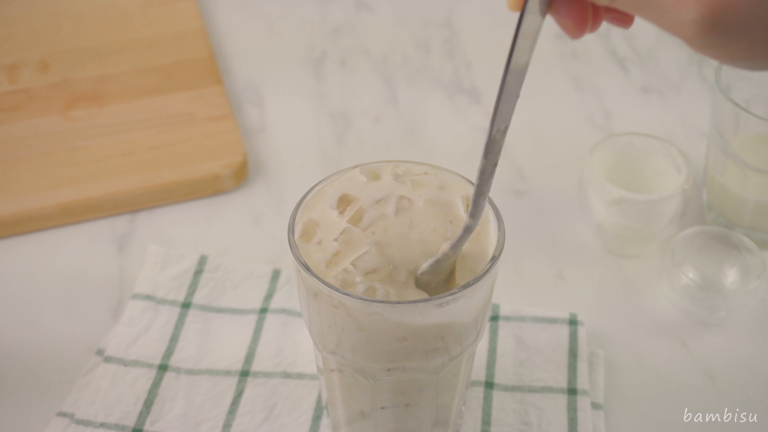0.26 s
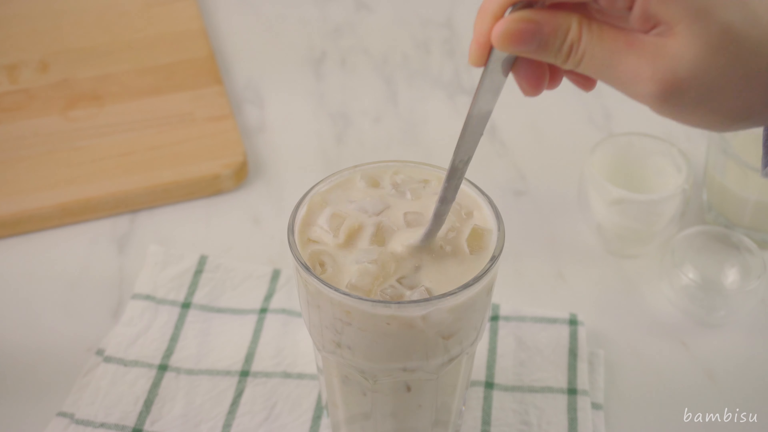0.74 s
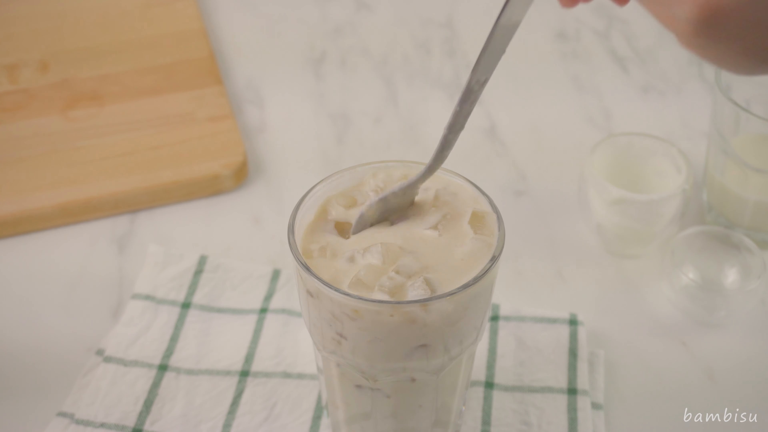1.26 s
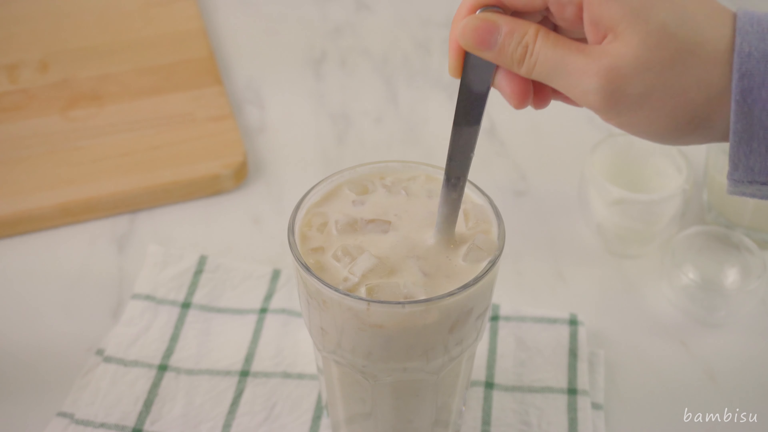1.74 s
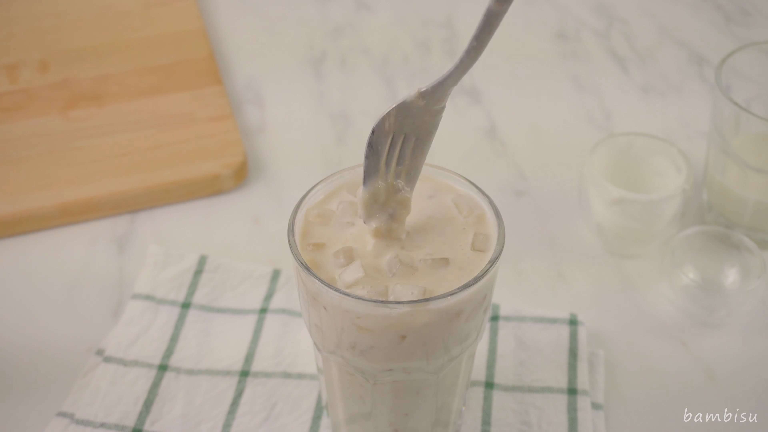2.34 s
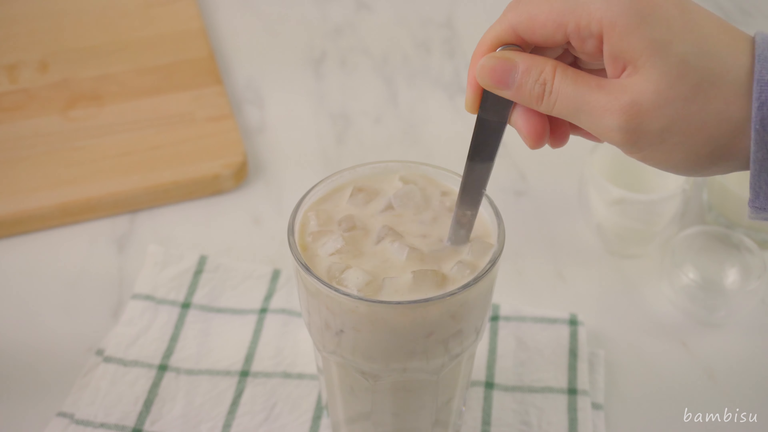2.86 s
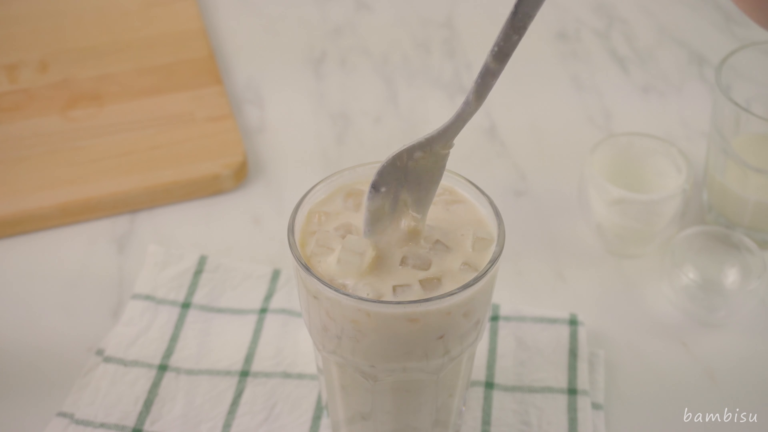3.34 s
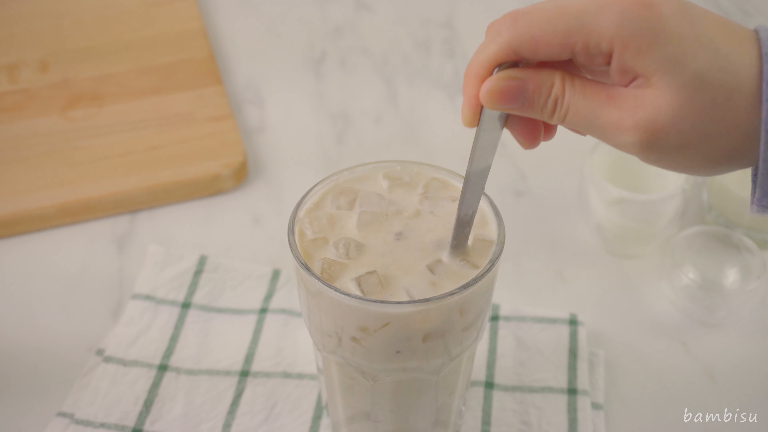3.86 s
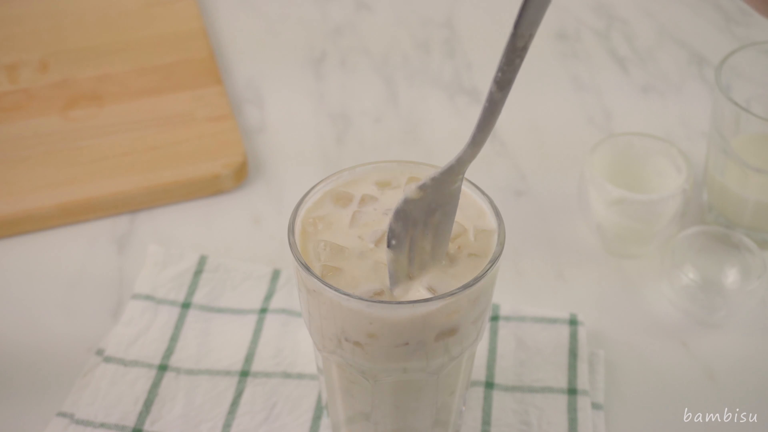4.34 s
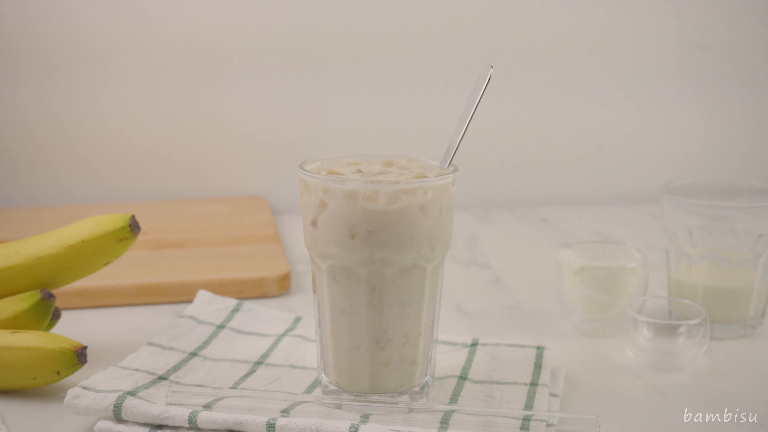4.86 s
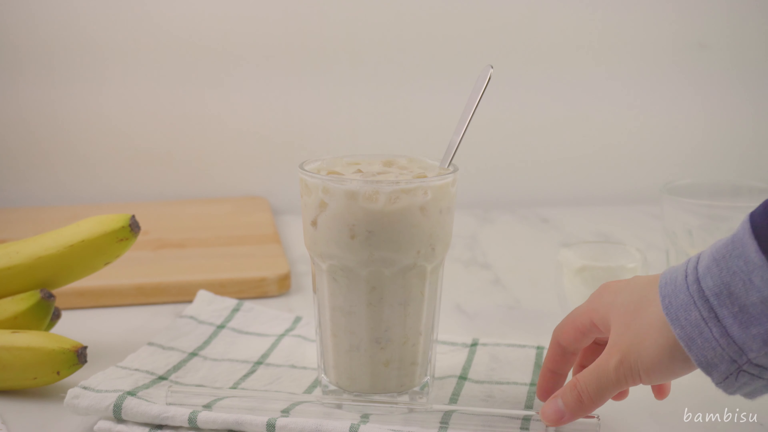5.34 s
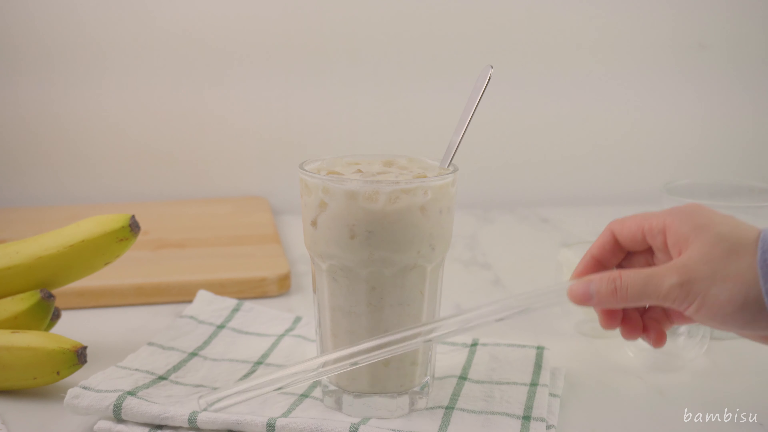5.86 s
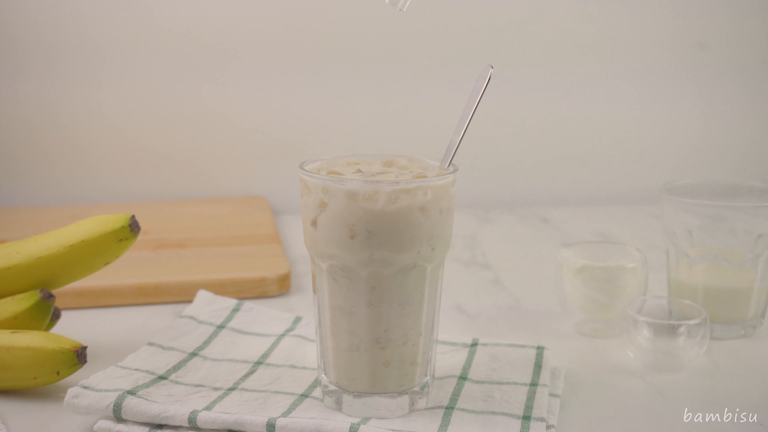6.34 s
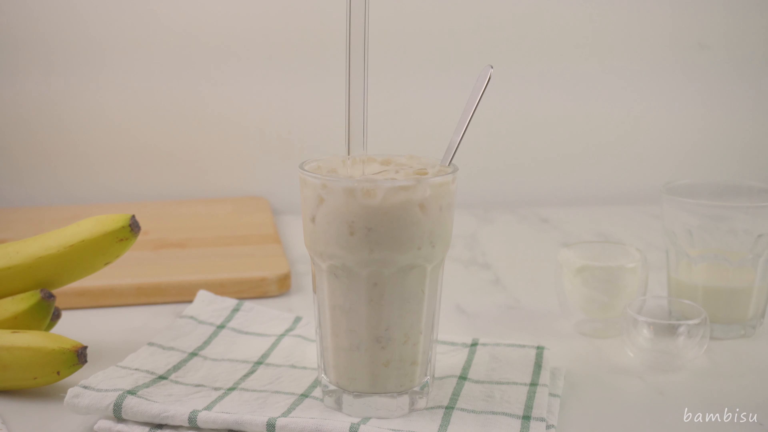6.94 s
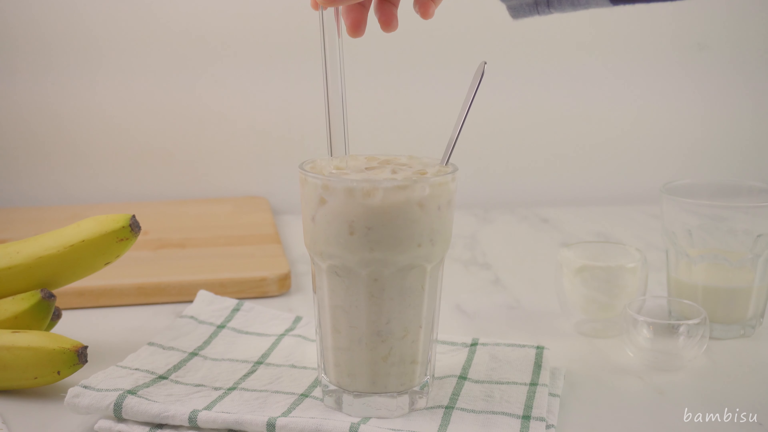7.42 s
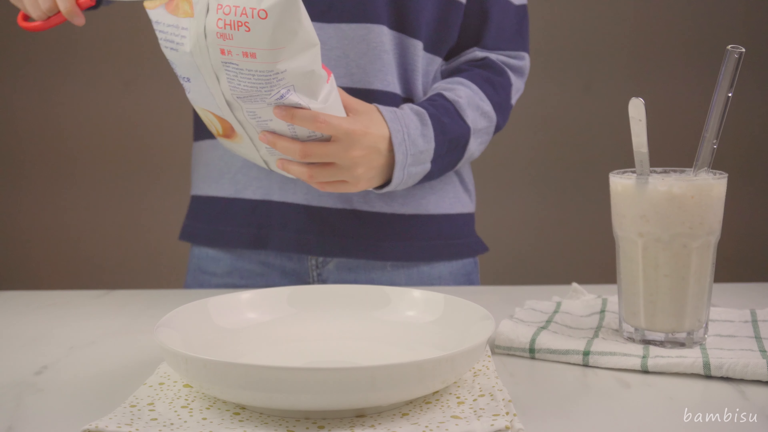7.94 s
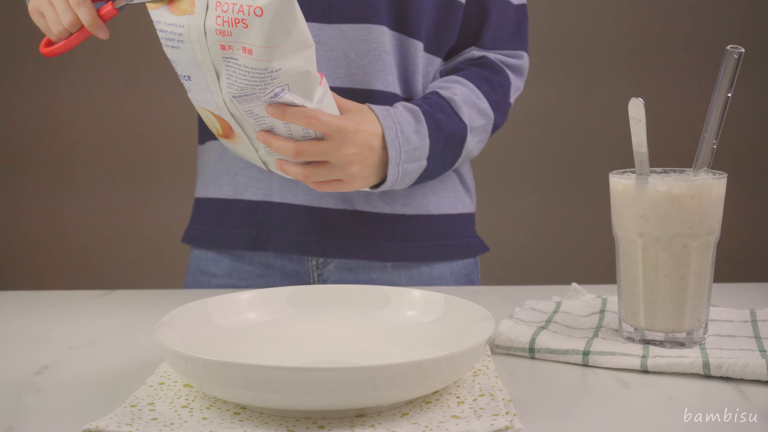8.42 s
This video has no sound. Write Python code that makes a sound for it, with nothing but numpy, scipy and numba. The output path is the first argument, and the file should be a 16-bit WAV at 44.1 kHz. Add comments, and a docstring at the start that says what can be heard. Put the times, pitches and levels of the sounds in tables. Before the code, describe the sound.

Close to the microphone in a quiet kitchen, a metal spoon slowly stirs ice in a tall, full glass. The cubes click and crunch in uneven clusters, with soft knocks as the glass rocks. After a pause, a glass straw clinks against the glass and is pushed through the ice with a few louder knocks. Finally, a little further off, a plastic crisp bag crinkles and snaps.

```python
"""Stirred ice and a crisp bag

Close by, a metal spoon slowly stirs ice in a tall glass of milky drink on a kitchen worktop.
Impacts excite the modes of cubes and glass, and the glass rocks on its cloth. A glass straw is
picked up, clinks and is pushed down through the ice. Further off, a plastic bag of crisps is
tipped: its film buckles in snaps and crackles, and the air inside resonates."""
import sys
import numpy as np
from scipy import signal
from scipy.fft import rfft, irfft
from scipy.io import wavfile
from scipy.ndimage import uniform_filter1d
from numba import njit

SR = 44100
rng = np.random.default_rng(int(sys.argv[2]) if len(sys.argv) > 2 else 0)


def dump(signal):
    """Clip the signal to [-1, 1] and save it as 16-bit WAV at the path in sys.argv[1]."""
    limited = np.clip(np.atleast_2d(signal).T, -1, 1)
    pcm = np.round(limited * 32767).astype(np.int16)
    wavfile.write(sys.argv[1], SR, pcm)


N = 382788
TIME = np.arange(N) / SR

# ice striking spoon, straw and wall: (time [s], level [dB], cube pitch [Hz], treble [dB])
ICE_IMPACTS = [(0.126, -24.5, 2520, -8), (0.135, -15.5, 2700, 0.5), (0.189, -21, 4670, -10),
               (0.2066, -21, 3470, 0), (0.251, -1.5, 11640, 3), (0.261, -10, 3520, 3),
               (0.2955, -6.5, 2550, -15), (0.3094, -9, 2700, -1.5), (0.3712, -7.5, 2870, -13.5),
               (0.4302, -11, 4840, -15.5), (0.4572, -8.5, 4170, -25), (0.7, -16, 1930, -41),
               (0.742, -16.5, 1850, -37), (0.768, -16.5, 2340, -14.5), (0.8017, -12, 2170, -14.5),
               (0.849, -1, 3840, -12.5), (1.0222, -28, 3410, -14), (1.2069, -22.5, 8400, -1),
               (1.2359, -8.5, 5400, -4), (1.2849, -6.5, 3560, -13), (1.2933, -2, 2170, -6.5),
               (1.4114, -15, 2680, -5), (1.4233, -6, 6000, -0.5), (1.538, -20.5, 2600, -7.5),
               (1.6291, -19, 2170, -4.5), (1.9235, -12, 2300, -13), (1.9578, -15.5, 2400, -19),
               (2.481, -18, 8370, 13), (2.5185, -12, 5760, -4), (2.5336, -13, 3570, -3),
               (2.564, -7, 3560, -16), (2.574, -4.5, 2510, -7), (2.62, -5.5, 1330, -17),
               (2.6283, -5, 2340, -9.5), (2.707, 7.5, 2320, -2.5), (2.912, -17.5, 9200, 14),
               (3.0553, -24, 2426, -14.5), (3.4058, -18, 3440, -10.5), (3.5084, -15.5, 2340, 2),
               (3.5344, -7.5, 4130, -5), (3.578, -4.5, 3740, -8), (3.61, -9, 2480, -13),
               (3.688, -7, 1470, -14.5), (3.769, -17, 3490, -4.5), (4.003, -14, 2230, -17),
               (4.0524, -15, 3600, -17), (4.077, -16.5, 4030, -16.5), (4.375, -24, 3450, -7),
               (4.388, -13, 8750, 9), (4.408, -13, 7960, 2), (4.447, -15.5, 3660, 1),
               (4.494, -22, 2630, -26), (4.5072, -6, 3590, -24.5), (4.563, -7.5, 4050, -19),
               (4.62, -12.5, 4160, -17.5), (4.699, -20, 4050, -15.5), (4.8406, -28, 2180, -4),
               (7.1195, 3.5, 2670, -5.5), (7.1517, -5, 1345, -3), (7.193, 6, 1300, -5.5),
               (7.221, -1, 3120, 1.5), (7.3201, -19.5, 5920, -4.5), (7.482, -33, 3160, -25)]
# spectrum of ice in the glass: (frequency [Hz], gain [dB])
ICE_SPECTRUM = [(300, -21.5), (750, -28), (1050, -7), (1400, -2), (1800, -7.5), (2350, 5.5), (4500, 1.5),
                (8000, 2), (11000, -10.5), (16000, -24)]
# modes of the glass, damped by the drink: (frequency [Hz], level [dB], t60 [s])
GLASS_MODES = [(1080, -3, .07), (1360, 0, .07), (2080, 4, .05)]
# pushes of the spoon: (start [s], push [s], settling [s], level [dB])
SPOON_STROKES = [(0.032, 0.08, 0.046, -58), (0.131, 0.2, 0.13, -40.5), (0.657, 0.11, 0.16, -57),
                 (1.208, 0.081, 0.31, -36), (1.42, 0.26, 0.019, -49.5), (1.879, 0.035, 0.29, -45),
                 (2.509, 0.25, 0.31, -43), (3.051, 0.055, 0.59, -57.5), (3.512, 0.12, 0.24, -35.5),
                 (3.96, 0.056, 0.076, -45.5), (4.391, 0.15, 0.23, -49.5)]
# blows that rock the glass: (time [s], level [dB], frequency [Hz])
GLASS_KNOCKS = [(0.768, -23.5, 302), (0.846, -19.5, 307), (1.285, -16, 304), (1.315, -16, 306),
                (1.661, -3, 298), (2.619, -7.5, 302), (2.704, -4, 297), (2.913, -21.5, 309),
                (3.578, -17.5, 308), (3.687, -15.5, 300), (6.743, -10, 314.4), (7.122, 4, 375.5),
                (7.191, 10.5, 328), (7.217, 4.5, 368)]
# thuds in the worktop: (time [s], level [dB], frequency [Hz])
WORKTOP_THUDS = [(1.266, -17, 72), (1.669, -15, 41.8), (2.709, -15.5, 67), (3.62, -6.5, 38.5),
                 (4.944, -20.5, 128), (5.789, -23.5, 201), (7.193, 2.5, 68)]
# modes of an air pocket under the ice: (frequency [Hz], level [dB], t60 [s])
POCKET_MODES = [(396, 11, 0.11), (576, -2, 0.076)]
# contacts of the straw: (time [s], level [dB])
STRAW_IMPACTS = [(6.743, 3), (6.7451, 4.5), (6.758, 1), (6.7868, -6.5)]
# bending modes of the straw: (frequency [Hz], level [dB], t60 [s])
STRAW_MODES = [(1637, -3, .1), (2250, 3, .04), (3370, 0, .16), (3470, -1, .14), (6390, -3, .15),
               (6510, -5, .19), (10200, -15, .12), (14650, -20, .11)]
# spectrum of glass striking glass: (frequency [Hz], gain [dB])
TICK_SPECTRUM = [(320, -25.5), (1420, -10.5), (2300, 0), (3420, 0.5), (5350, -11.5), (6540, -6),
                 (15000, -36)]
# creases snapping through: (time [s], level [dB], pitch [Hz], treble [dB])
CREASE_SNAPS = [(7.74, 1, 1560, -17), (7.856, -6, 720, -43), (7.9073, 0, 3570, -4.5), (8.05, 0.5, 690, -19),
                (8.105, 5, 2285, -14.5), (8.177, -1.5, 1920, -8), (8.203, -8.5, 3150, -15),
                (8.471, -7.5, 2500, -30), (8.488, -18, 3180, -12), (8.502, 9, 3870, 0.5),
                (8.512, 8.5, 799, 20), (8.567, 5, 1430, 4), (8.594, -0.5, 4520, 6), (8.602, 3, 1430, 16)]
# spectra of the bag's creasing film and flexing panels: (frequency [Hz], gain [dB])
FILM_SPECTRUM = [(350, -19), (600, 3.5), (1160, 0), (1660, 2.5), (8050, -6.5), (16000, -27.5)]
PANEL_SPECTRUM = [(260, -4), (400, 0.5), (650, 4), (1000, -15.5), (1800, -32)]
# shakes of the bag: (start [s], push [s], settling [s], crinkle level [dB], panel level [dB])
BAG_SHAKES = [(7.71, 0.032, 1, -43, -37.5), (7.838, 0.11, 0.18, -31, -34.5), (7.96, 0.1, 0.15, -38, -26),
              (8.14, 0.031, 0.8, -41.5, -47), (8.482, 0.049, 0.16, -22.5, -31.5),
              (8.551, 0.043, 0.069, -26.5, -40)]
# squeezes of the bag: (start [s], push [s], settling [s], level [dB], pitch [Hz], glide [Hz/s])
BAG_SQUEEZES = [(7.703, 0.0092, 0.037, -34.5, 913, -500), (7.84, 0.0082, 0.056, -26.5, 452, 0),
                (7.904, 0.0044, 0.071, -27, 622, -900), (7.963, 0.05, 0.018, -23.5, 451, -1300),
                (8.044, 0.0092, 0.012, -18, 543, 0), (8.516, 0.0074, 0.16, -16.5, 401, 1800),
                (8.542, .025, 0.083, -16, 499.5, 602)]
# spectrum of the kitchen's background: (frequency [Hz], gain [dB])
AIR_SPECTRUM = [(15, -44.5), (25, 3.5), (157, -5), (293, -8), (591, -21.5), (1400, -25.5),
                (5000, -35.5), (11300, -37.5), (16000, -62.5)]


def ice_clinks(size=6000, rebound_s=.0031):
    """Impact excitation: each contact cracks, rebounds once and sets cube and glass ringing."""
    out = np.zeros(N)
    for s, db, hz, treble_db in ICE_IMPACTS:
        rebound = .5 * np.roll(crack(.0092, size), int(rng.random() * rebound_s * SR))
        contact = unit(colour(crack(.009, size) + rebound + crack(.077, size), ICE_SPECTRUM))
        cube = ring([(hz, 0, .012), (1.27 * hz, -5, .007)], 2, size)
        cube_db = np.interp(treble_db, [-19, -1], [2, -6])  # blunt contacts ring, sharp ones crack
        wall = ring(GLASS_MODES, 4.6, size, detune=.05)  # cubes pressing on the wall shift its modes
        click = harden(contact + undb(cube_db) * cube, treble_db) + undb(-20) * wall
        # light, blunt contacts lack the highest treble; only heavy ones reach the low range
        top_hz = np.interp(db + treble_db, [-35, -5], [8000, 17000])
        bottom_hz = np.interp(db, [-6, 4], [920, 320])
        add(out, s, undb(db) * cut(cut(click, top_hz, "low"), bottom_hz, "high"))
    return out


def ice_crunch(size=2000):
    """Superposition of random impacts: the spoon jostles cubes, each size ticking at its own pitch."""
    ticks = np.zeros(N)
    for hz in np.geomspace(1330, 4800, 9):
        tick = ring([(hz, 0, .007)], 0, size) + undb(-2) * crack(.009, size)
        ticks += signal.fftconvolve(grains(55, 5.8), tick)[:N]
    ticks = cut(colour(ticks, ICE_SPECTRUM), 700, "high")
    # the rubbing swells as cubes pack ahead of the spoon
    rubbing = sum(undb(db) * effort(start, push, settle, swell_db=14.5)
                  for start, push, settle, db in SPOON_STROKES)
    force = np.interp(20 * np.log10(rubbing + 1e-12), [-59.5, -41.5], [0, 1])
    gentle = np.sqrt(1 - force) * cut(ticks, 2500, "low", order=2)
    hard = np.sqrt(force) * cut(ticks, 13000, "low", order=2)
    return even(gentle + hard, size=4000) * rubbing


def rocking_glass(size=16000):
    """Frictional damping: the heavy glass rocks on its cloth, stopping sooner after hard blows."""
    out = np.zeros(N)
    t = TIME[:size]
    for s, db, hz in GLASS_KNOCKS:
        decay_s = np.interp(db, [-4.5, 4.5], [.042, .019])
        envelope = (1 - fade(.011, size)) * np.exp(-(t / decay_s) ** 3)
        wobble = steady(cut(rng.standard_normal(size), 22, "low", order=2))  # from the shifting ice
        rock = unit(np.sin(2 * np.pi * hz * t + .5 * wobble) * envelope)
        slosh_db = np.interp(db, [-15, 5], [-7.5, -1.5])  # the drink takes up the jolt
        slosh = undb(slosh_db) * unit(cut(crack(.073, size), 440, "low"))
        add(out, s, undb(db) * unit(cut(rock + slosh, 295, "high", order=8)))
    return out


def worktop_thuds(size=16000):
    """Structural vibration: two low modes of the worktop build slowly and decay."""
    out = np.zeros(N)
    for s, db, hz in WORKTOP_THUDS:
        modes = ring([(hz, 0, .17), (1.9 * hz, -11, .11)], .94, size)
        add(out, s, undb(db) * unit(modes * (1 - fade(.24, size))))
    return out


def gulp(size=8000, closing_s=.013):
    """Bubble resonance: an air pocket rings briefly as the drink closes over it behind the spoon."""
    out = np.zeros(N)
    envelope = (1 - fade(.01, size)) * np.exp(-(TIME[:size] / closing_s) ** 2)
    add(out, 1.664, undb(-9) * unit(ring(POCKET_MODES, .89, size) * envelope))
    return out


def straw(size=14000):
    """Bending modes: the glass tube rings when struck and whispers as it slides off the cloth."""
    out = np.zeros(N)
    for s, db in STRAW_IMPACTS:
        tick = unit(colour(crack(.011, size), TICK_SPECTRUM))
        clink = tick + undb(-6.5) * ring(STRAW_MODES, 1, size)
        top_hz = np.interp(db, [-3, 2], [6000, 15000])  # rebounds are duller
        add(out, s, undb(db) * cut(clink, top_hz, "low", order=2))
    friction = rng.standard_normal(size) * np.hanning(size)
    slide = signal.fftconvolve(friction, ring(STRAW_MODES, .76, size))
    add(out, 5.87, undb(-85.5) * steady(cut(slide, 8700, "high", order=2)))
    return out


def crisp_bag(size=3000):
    """Buckling: creases snap, wrinkles crackle and flexing panels drum on the enclosed air."""
    out = np.zeros(N)
    for s, db, hz, treble_db in CREASE_SNAPS:
        snap = unit(colour(crack(.031, size), FILM_SPECTRUM)) + ring([(hz, 0, .005)], 0, size)
        add(out, s, undb(db) * harden(snap, treble_db))
    # each wrinkle sets the film buzzing for a few ms
    bursts = signal.fftconvolve(np.abs(grains(330, 5)), fade(.012, size))[:N]
    wrinkles = even(colour(bursts * rng.standard_normal(N), FILM_SPECTRUM), size=3500)
    panels = even(colour(grains(350, 3.5), PANEL_SPECTRUM), size=1500)
    for start, push, settle, crinkle_db, panel_db in BAG_SHAKES:
        top_hz = np.interp(crinkle_db, [-45, -34], [9000, 15500])  # gentle handling is duller
        crinkle = undb(crinkle_db) * cut(wrinkles, top_hz, "low")
        out += effort(start, push, settle, swell_db=16) * (crinkle + undb(panel_db) * panels)
    return cut(out + bag_cavity(), 170, "high", order=6)


def bag_cavity(width_hz=70, overtone_db=-16):
    """Cavity resonance: buckling film rings the air in the bag; squeezing shifts the pitch."""
    out = np.zeros(N)
    for start, push, settle, db, hz, glide in BAG_SQUEEZES:
        pitch = hz + glide * np.clip(TIME - start, 0, push + settle)
        buckling = grains(700, 2.1)
        hoot = sum(gain * resonate(resonate(buckling, centre, width_hz), centre, width_hz)
                   for centre, gain in [(pitch, 1), (2 * pitch, undb(overtone_db))])
        out += even(hoot, size=700) * undb(db) * effort(start, push, settle, swell_db=5.5)
    return out


def fingers(size=9000):
    """Friction and impact: fingertips scuff worktop and cloth, then tap the straw's end down."""
    out = np.zeros(N)
    scuff = unit(cut(cut(crack(.5, size), 330, "high"), 650, "low"))
    brush = cut(crack(.25, size), 6000, "high", order=2)
    brush = unit(cut(brush, 8500, "low", order=8))
    add(out, 5.64, undb(-26.5) * (scuff + .5 * brush))
    contact = unit(cut(cut(crack(.051, size), 2100, "high"), 2100, "low"))
    tap = contact + undb(-11) * ring(STRAW_MODES, 1, size)
    add(out, 5.745, undb(-29.5) * tap)
    return out


def kitchen_air(stirring_ends_s=4.85):
    """Ambient noise: faint rumble and hiss, softer and duller during the stirring."""
    air = undb(-64) * steady(colour(rng.standard_normal(N), AIR_SPECTRUM, size=8192))
    return np.where(TIME < stirring_ends_s, undb(-2) * cut(air, 3500, "low", order=1), air)


def room(x, t60, wet_db, damp_hz, size=32768):
    """Reverberation: direct sound plus a diffuse tail whose treble dies sooner."""
    noise = rng.standard_normal(size)
    low = cut(noise, damp_hz, "low", order=2) * fade(t60, size)
    high = cut(noise, damp_hz, "high", order=2) * fade(.5 * t60, size)
    tail = (low + high) * (1 - fade(.0062, size))  # reflections take a few ms to build up
    return x + undb(wet_db) * signal.fftconvolve(x, unit(tail))[:N]


def effort(start, push, settle, swell_db, grip_s=.011, settle_db=36.5):
    """Amplitude envelope: a hand movement takes hold, swells, then decays exponentially."""
    t = TIME - start
    rise_db = -swell_db * np.clip(1 - t / push, 0, 1)
    loss_db = settle_db * np.maximum(t - push, 0) / max(settle, .01)
    return np.clip(t / min(grip_s, push), 0, 1) * undb(rise_db - loss_db)


def ring(modes, scatter_db, size, detune=.004):
    """Modal superposition: each blow lands elsewhere and weights the decaying modes anew."""
    out = np.zeros(size)
    for hz, db, t60 in modes:
        gain = undb(db + scatter_db * rng.standard_normal())
        pitch = hz * (1 + detune * rng.standard_normal())
        out += gain * fade(t60, size) * np.sin(2 * np.pi * pitch * TIME[:size])
    return unit(out)


def crack(t60, size):
    """Contact transient: a burst of decaying noise."""
    return unit(rng.standard_normal(size) * fade(t60, size))


def harden(click, treble_db):
    """Contact stiffness: a harder contact puts more of its energy in the treble."""
    return unit(unit(cut(click, 4400, "low")) + undb(treble_db) * unit(cut(click, 6000, "high")))


def grains(per_second, spread_db):
    """Poisson process: random clicks, a few much larger than the rest; rms one."""
    sizes = undb(spread_db * np.minimum(rng.exponential(size=N), 4))
    return steady((rng.random(N) < per_second / SR) * sizes * rng.choice([-1, 1], N))


@njit
def resonate(x, hz, width_hz):
    """Second-order resonance: a band-pass with a moving centre."""
    y, band_state, low_state = np.empty(len(x)), 0., 0.
    for i in range(len(x)):
        step, damping = np.tan(np.pi * hz[i] / SR), width_hz / hz[i]
        band = (band_state + step * (x[i] - low_state)) / (1 + step * (step + damping))
        band_state = 2 * band - band_state
        low_state += 2 * step * band
        y[i] = damping * band
    return y


def colour(x, points, size=2048):
    """Minimum-phase filtering through points of (frequency [Hz], gain [dB])."""
    hz, db = np.transpose(points)
    freq = np.maximum(np.fft.rfftfreq(size, 1 / SR), 1)
    gain = undb(np.interp(np.log(freq), np.log(hz), db))
    cepstrum = irfft(np.log(gain))
    cepstrum[1:size // 2] *= 2
    cepstrum[size // 2 + 1:] = 0
    return signal.fftconvolve(x, irfft(np.exp(rfft(cepstrum))))[:len(x)]


def cut(x, hz, kind, order=4):
    """Butterworth low-pass or high-pass filtering."""
    return signal.sosfilt(signal.butter(order, min(hz, SR / 2 - 1), kind, fs=SR, output="sos"), x)


def fade(t60, size):
    """Exponential decay by 60 dB in t60 seconds."""
    return np.exp(-np.log(1000) * TIME[:size] / t60)


def undb(db):
    """Conversion of decibels to amplitude ratio."""
    return 10 ** (np.asarray(db) / 20)


def unit(x):
    """Normalisation to unit energy."""
    return x / np.sqrt(np.sum(x ** 2) + 1e-18)


def steady(x):
    """Normalisation to unit rms."""
    return unit(x) * np.sqrt(len(x))


def even(x, size):
    """Normalisation to unit short-term rms."""
    return x / np.sqrt(np.abs(uniform_filter1d(x ** 2, size)) + 1e-12)


def add(out, s, x):
    """Superposition of x onto out at time s."""
    i = int(s * SR)
    out[i:i + len(x)] += x[:N - i]


def scene():
    """Direct-to-reverberant ratio: the near drink sounds drier than the distant bag."""
    near = room(ice_clinks() + ice_crunch() + straw() + fingers(), t60=.24, wet_db=-10, damp_hz=7060)
    body = room(rocking_glass() + worktop_thuds() + gulp(), t60=.24, wet_db=-16, damp_hz=2000)
    far = room(crisp_bag(), t60=.32, wet_db=-7, damp_hz=10000)
    return (near + body + far + kitchen_air())[None]


def record(dry, top_hz=16200):
    """Band limiting: a steep low-pass removes the highest treble."""
    return signal.sosfilt(signal.ellip(8, .2, 70, top_hz, fs=SR, output="sos"), dry)


dry = scene()
out = record(dry)
dump(out)
```